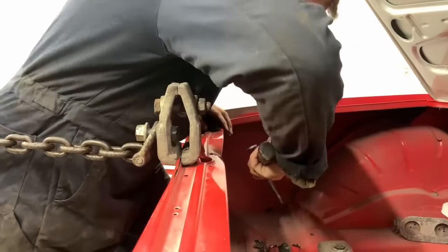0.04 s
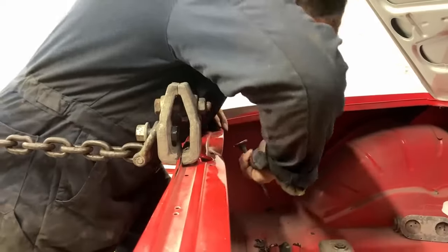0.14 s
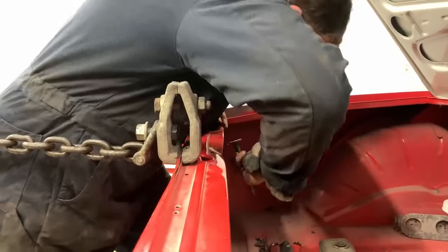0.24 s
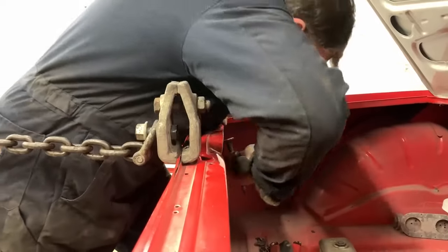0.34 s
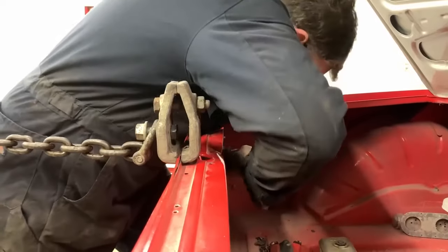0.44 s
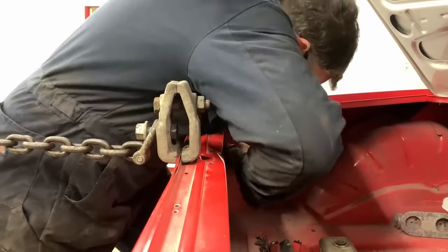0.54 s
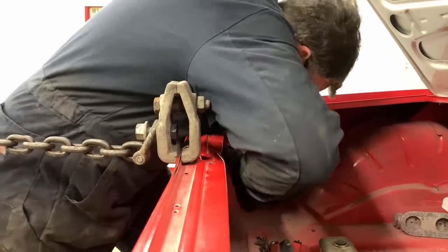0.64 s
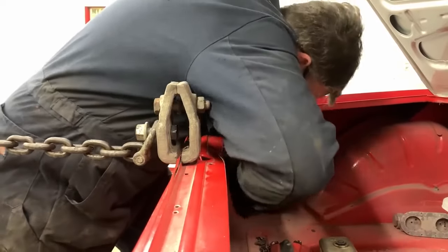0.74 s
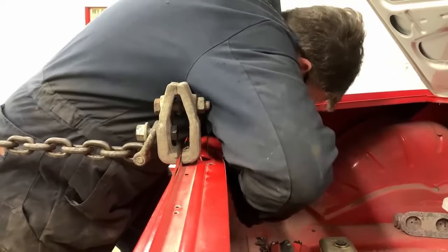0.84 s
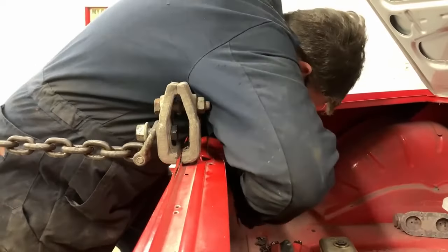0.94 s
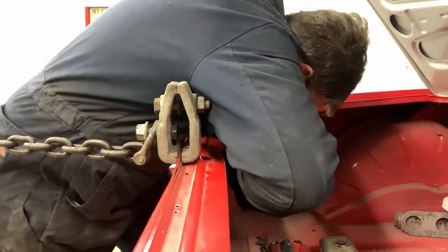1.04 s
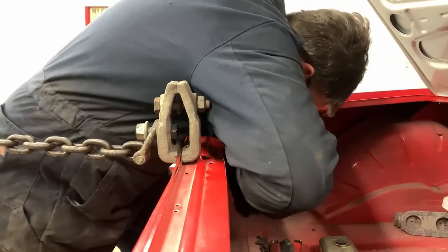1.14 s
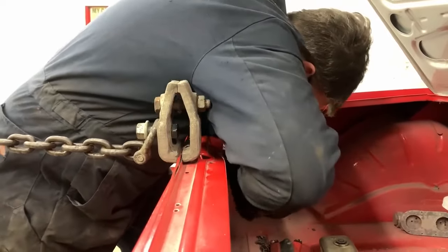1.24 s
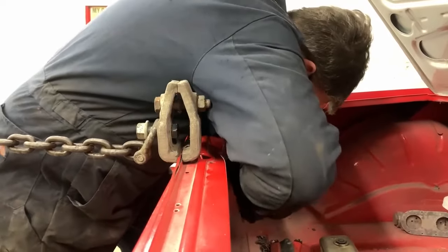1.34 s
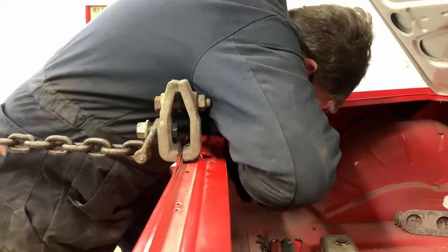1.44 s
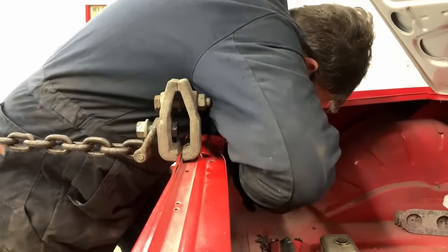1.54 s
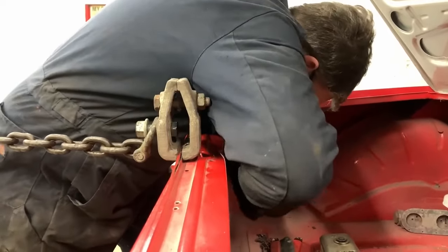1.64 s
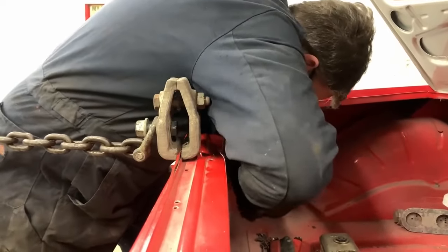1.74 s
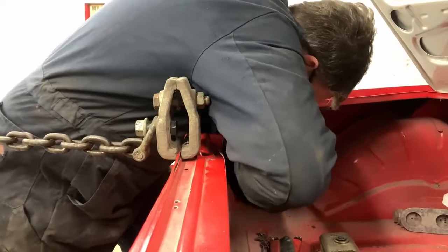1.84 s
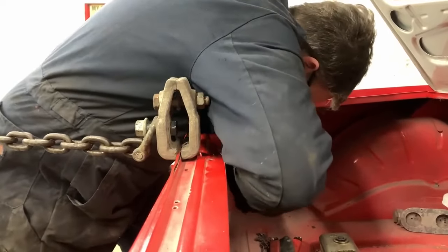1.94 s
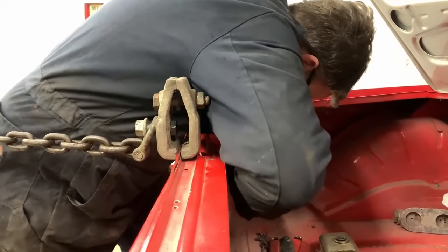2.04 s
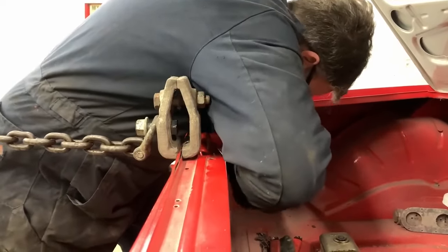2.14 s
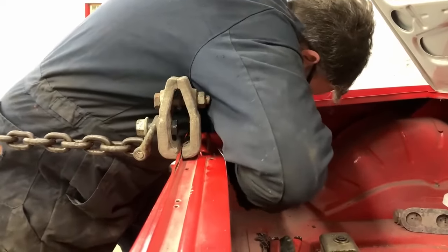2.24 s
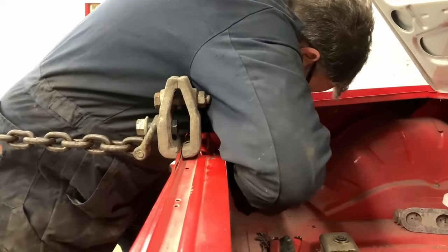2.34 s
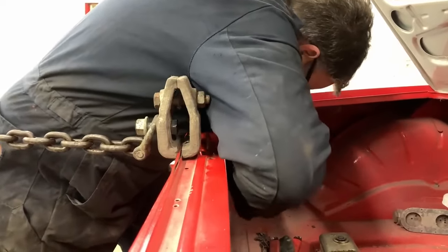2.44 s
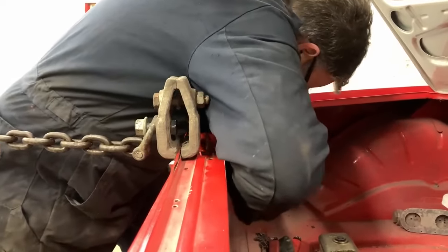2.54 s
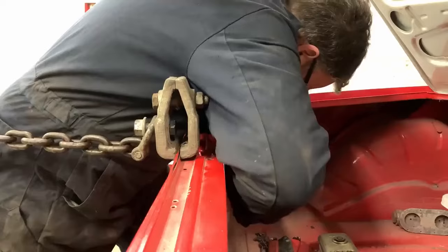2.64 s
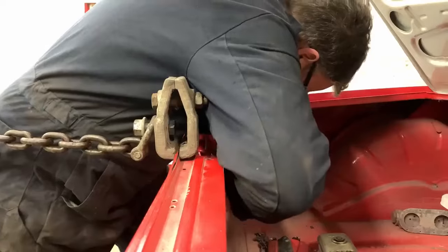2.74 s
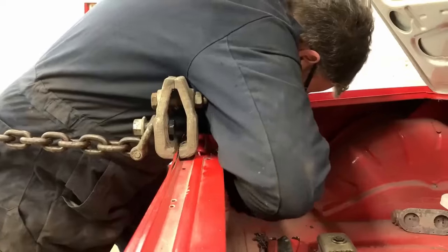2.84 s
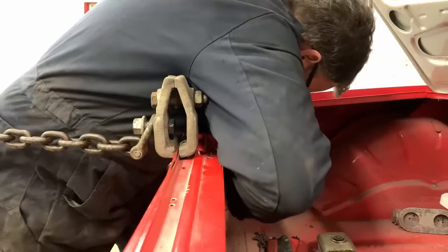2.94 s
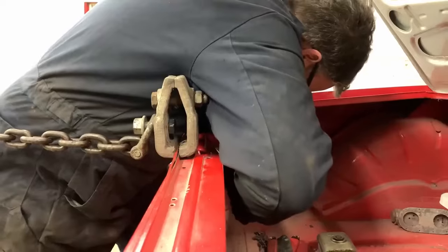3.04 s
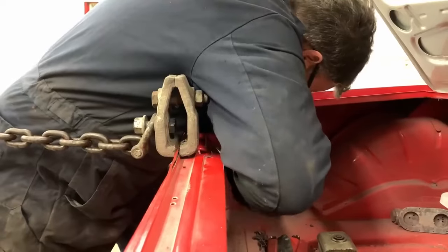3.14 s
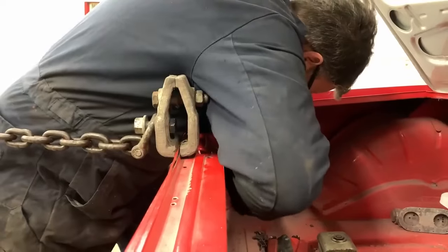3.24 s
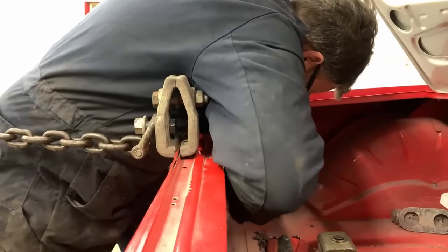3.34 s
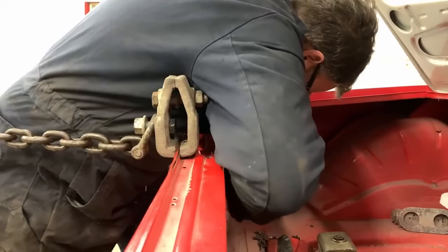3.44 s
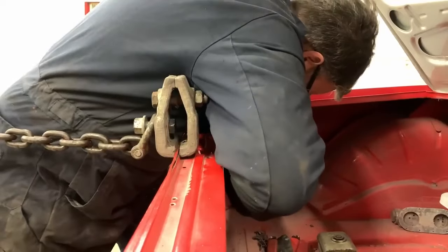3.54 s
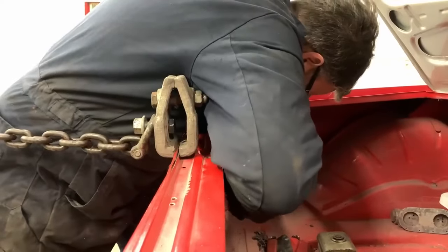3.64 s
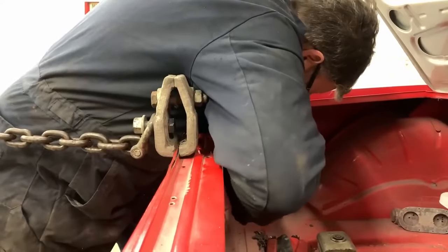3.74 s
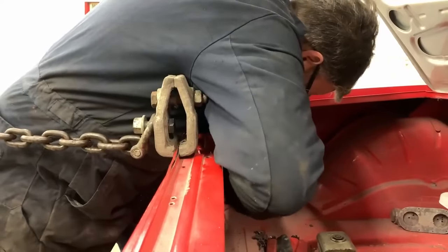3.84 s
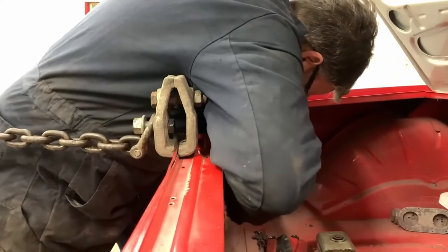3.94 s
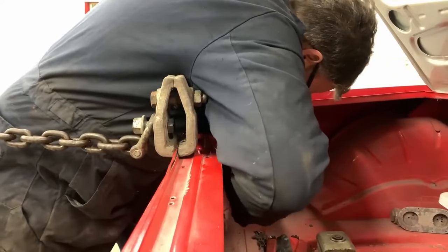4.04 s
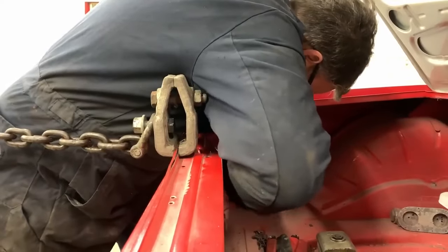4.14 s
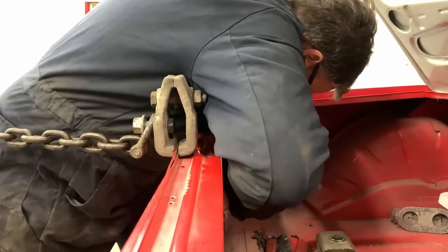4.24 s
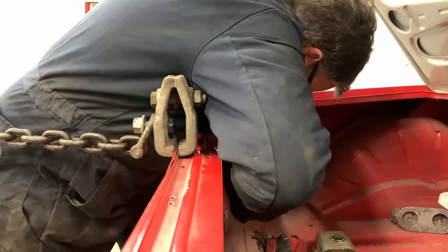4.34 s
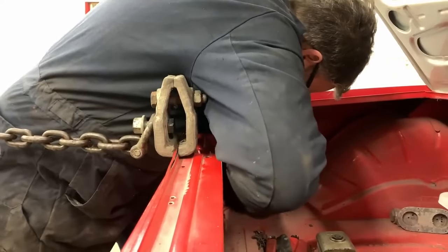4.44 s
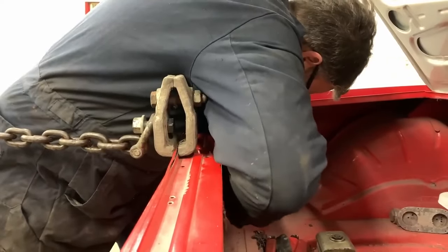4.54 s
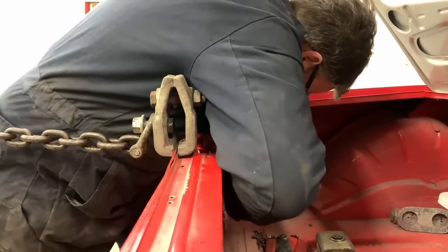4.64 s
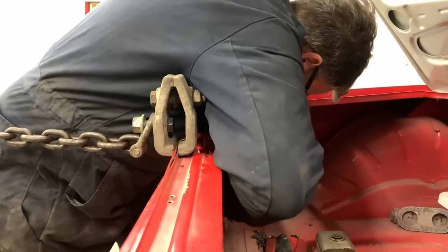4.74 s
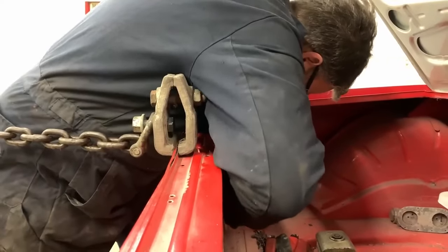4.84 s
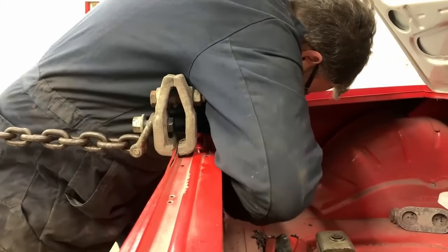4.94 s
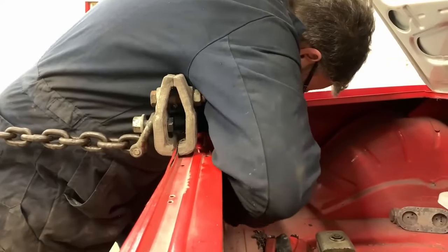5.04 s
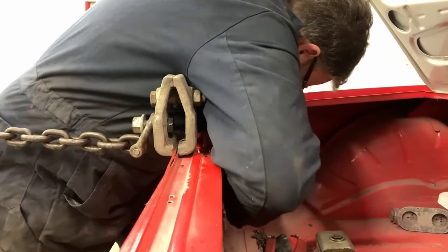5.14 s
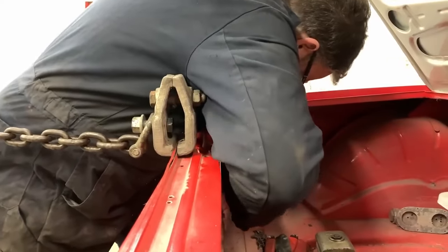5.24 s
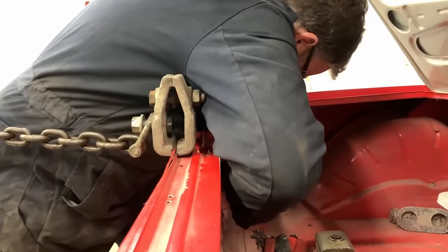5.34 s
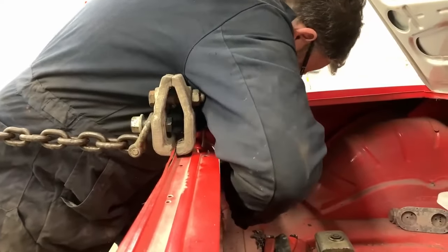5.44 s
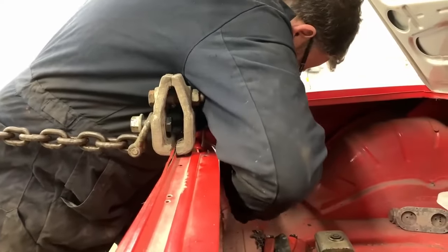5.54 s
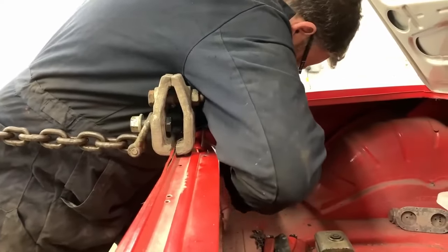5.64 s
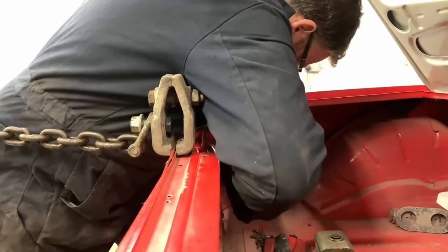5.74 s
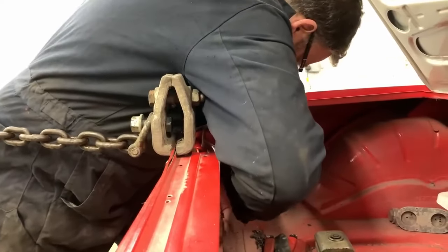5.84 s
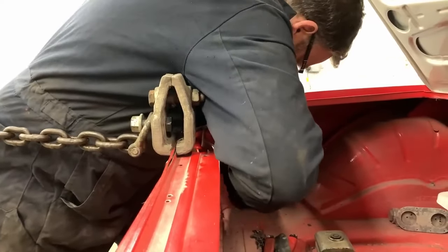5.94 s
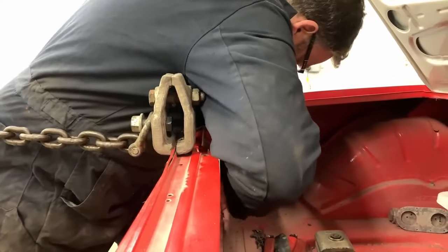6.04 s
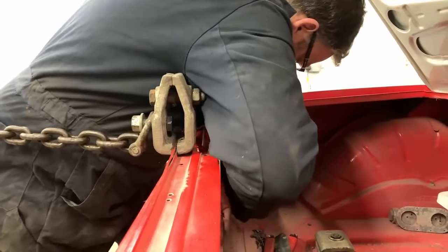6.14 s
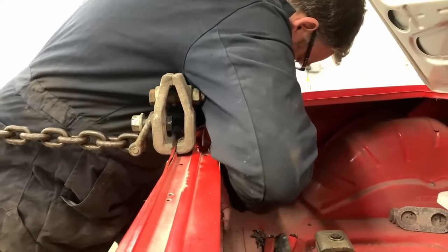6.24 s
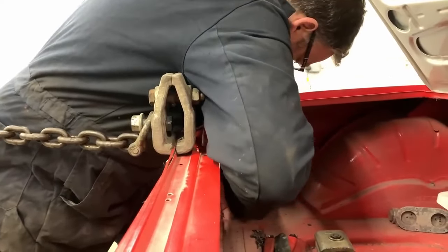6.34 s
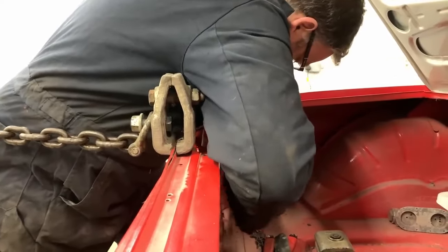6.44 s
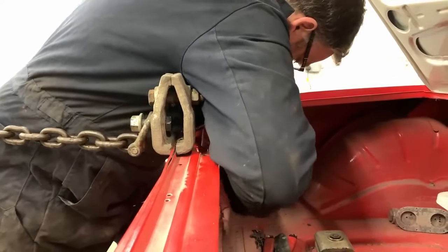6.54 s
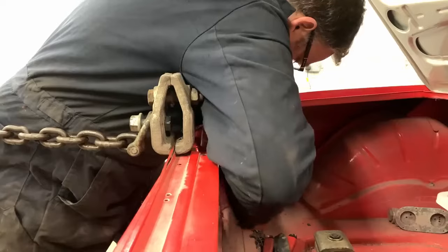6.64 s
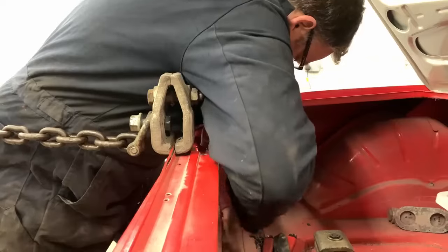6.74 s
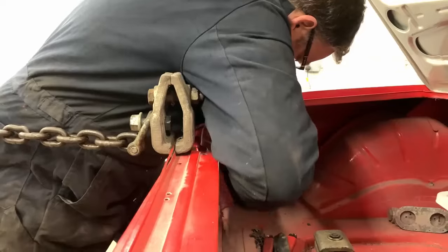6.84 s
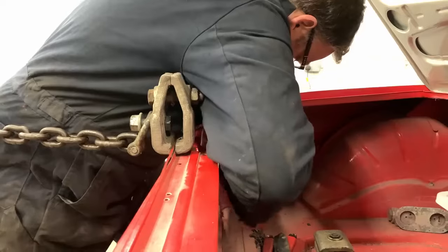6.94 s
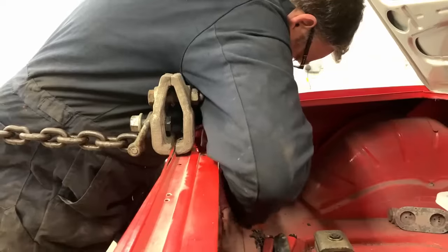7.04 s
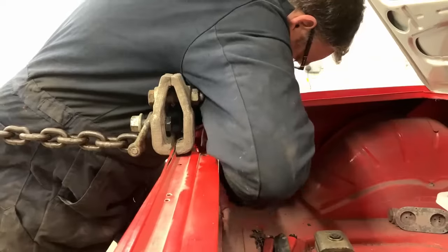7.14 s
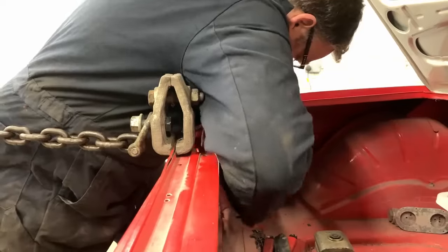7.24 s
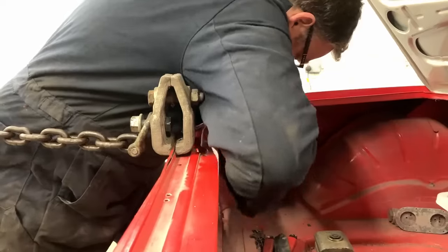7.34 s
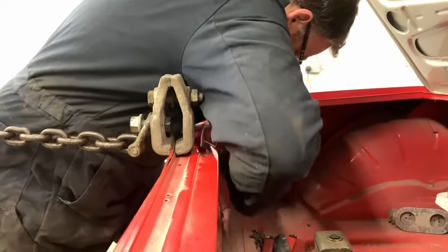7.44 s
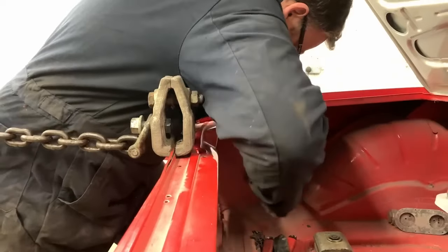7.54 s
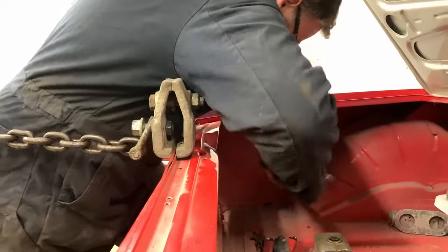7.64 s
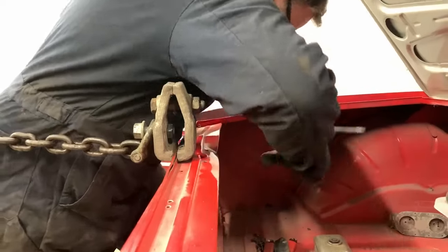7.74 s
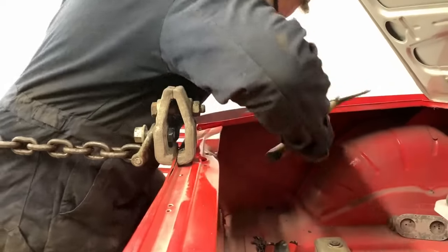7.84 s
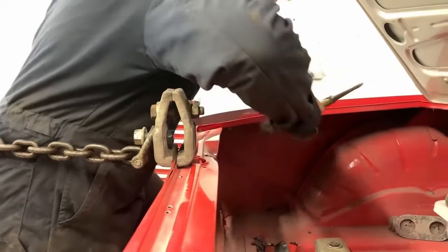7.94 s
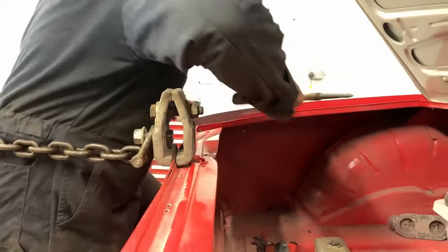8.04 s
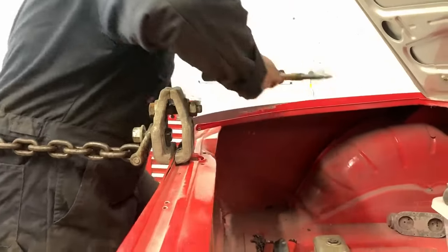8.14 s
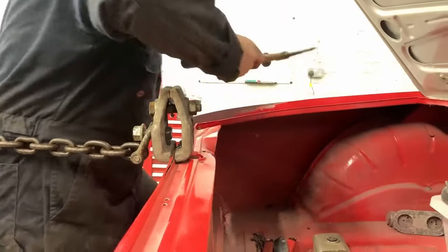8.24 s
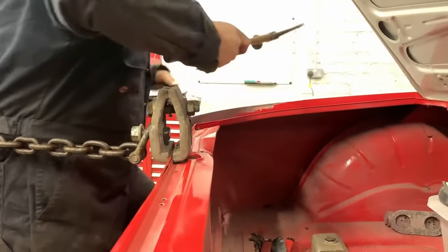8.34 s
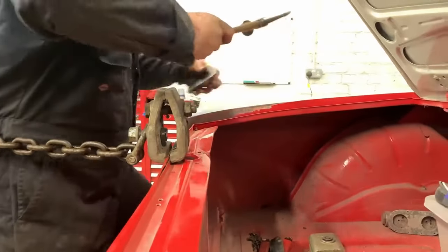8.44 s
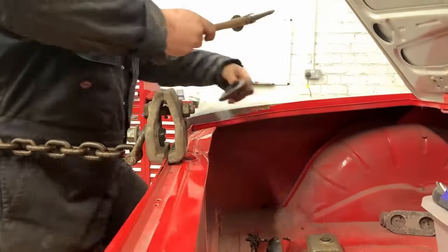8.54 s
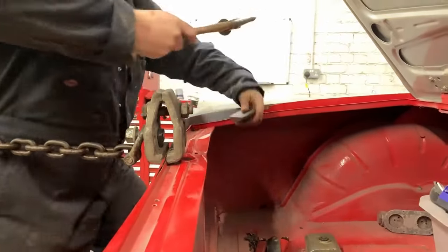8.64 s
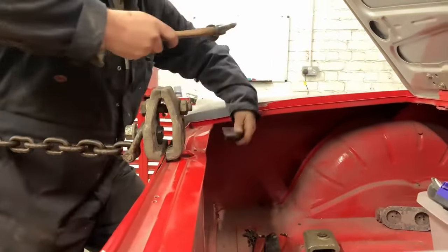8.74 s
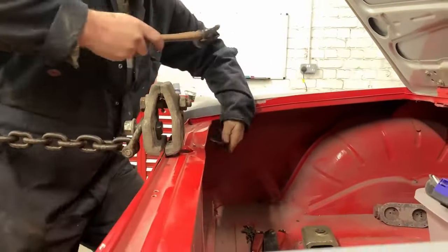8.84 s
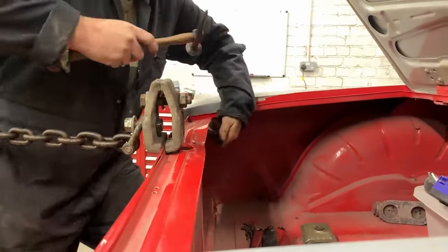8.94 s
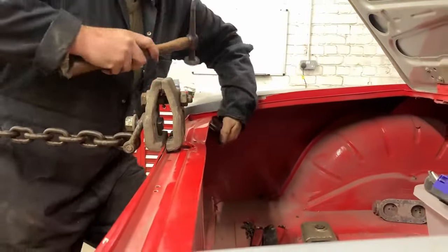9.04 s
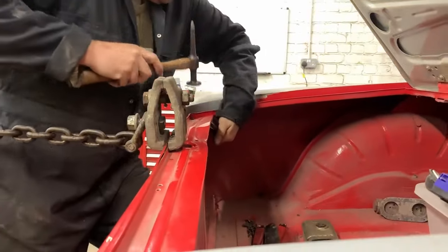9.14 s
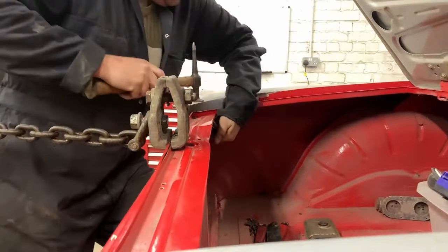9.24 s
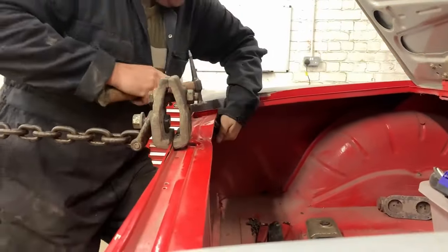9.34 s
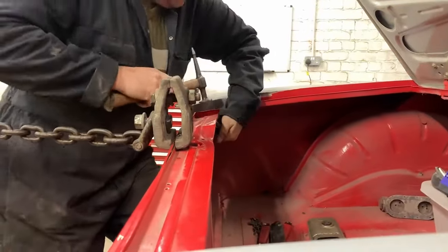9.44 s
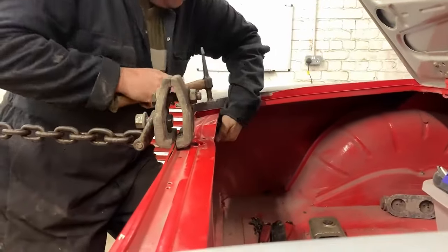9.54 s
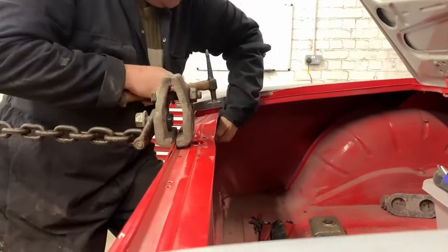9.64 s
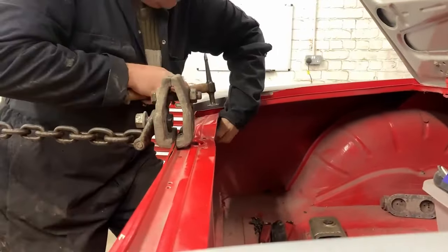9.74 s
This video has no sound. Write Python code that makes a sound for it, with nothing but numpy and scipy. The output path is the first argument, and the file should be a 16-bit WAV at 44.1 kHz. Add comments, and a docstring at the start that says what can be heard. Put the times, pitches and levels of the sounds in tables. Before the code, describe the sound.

Loud, close hammer blows on car sheet metal, about three a second, with metallic rebounds and a short workshop ring.

```python
"""Hammer and dolly on a car wing.

A body hammer beats a steel inner wing against a hand-held dolly, in runs of about three blows a second.
Each blow sets the sheet crashing (band noise) and the body shell booming (decaying sines); the tools
bounce and clatter after it. The workshop rings on, and full blows overload the close microphone.
Near the end the tools tick in the hand and a sleeve scrapes softly."""
import sys
import numpy as np
from scipy import signal
from scipy.io import wavfile

SR = 44100
rng = np.random.default_rng(int(sys.argv[2]) if len(sys.argv) > 2 else 0)


def log_audio(samples):
    """Write samples as a 16-bit WAV file to the path given in sys.argv[1]."""
    # one column per channel
    frames = np.atleast_2d(samples).T
    # limit to full scale, then quantise
    limited = np.clip(frames, -1, 1)
    pcm = np.round(limited * 32767).astype(np.int16)
    wavfile.write(sys.argv[1], SR, pcm)


N = 431298

# hammer blows: (time [s], strength [dB], dolly firmness [0-1])
BLOWS = [(0.65, -13.5, .65), (1.1054, 2, .1), (1.5036, 4.5, .1), (1.878, 1.5, .15), (2.2164, -3, .05),
         (2.8663, -6, .02), (3.2121, -0.5, .15), (3.565, -1, .1), (3.8828, -2, .15), (4.1751, -1, .08),
         (4.4662, -2, .08), (4.747, 0.5, .1), (5.0328, -1.5, .1), (5.7104, -16, .95), (6.035, -3, .97),
         (6.3463, -3, .95), (6.6343, -1, .9), (6.9176, -2, .95), (7.203, -4, .97), (7.452, -7.5, .97)]
# tool knocks and bounces, from faint bumps to two loud slap-backs:
# (time [s], strength [dB], hardness [0 dull bump - 1 clean clink])
KNOCKS = [(0.002, -56, 0.59), (0.153, -54, .1), (0.659, -21, 0.88), (1.3194, -27.5, 0.46),
          (1.6802, -23.5, 0.83), (2.0552, -22.5, 0.73), (2.4254, -25, 0.83), (2.9305, -19, .75),
          (2.9936, -20, 0.41), (3.2489, -4, .7), (3.3052, -19, 0.91), (3.34, -21.5, .9),
          (3.3635, -21.5, 0.52), (5.0814, -2, 0.87), (5.1047, -10.5, 0.95), (5.3498, -36, .7),
          (5.462, -54.5, .85), (5.69, -56, .5), (9.004, -16, .45), (9.17, -31.5, .02), (9.71, -65.5, 0.99)]
# regripping ticks: (time [s], level [dB], centre [Hz])
GRIP_TICKS = [(8.662, -47, 994), (8.691, -51, 5560), (8.714, -44, 5290), (8.755, -51, 5720),
              (8.789, -50, 6130), (9.685, -52, 799)]
# tone of the spot under the hammer: (time [s], treble [dB], low midrange [dB])
SPOT_TONE = [(1.399, -9, -1.5), (2.0, -5, 2.5), (3.9, -1, 4), (4.899, -3.5, 0.5), (7.2, -1, 2)]
# dense bending modes of the sheet: (frequency [Hz], density [dB/Hz], t60 [s])
SHEET_SPECTRUM = [(30, -53, 0.22), (65, -43, 0.53), (127, -32.5, 0.27), (220, -23.5, .42), (380, -36, 0.41),
                  (694.4, -32, 0.24), (1307, -35, 0.15), (3100, -31, 0.11), (4800, -33, 0.096),
                  (7500, -32, 0.096), (11000, -38, 0.062), (16000, -52, 0.1)]
# low modes of the body shell: (frequency [Hz], level [dB], t60 [s])
SHELL_MODES = [(87.4, -10, 0.47), (157.4, -12.5, .6), (183.7, -13, .6), (199.1, -9, 0.59),
               (225.7, -18, .62), (313, -6.5, 0.4), (458, -10, 0.33), (510.7, -10, 0.27), (599, -9.5, 0.35),
               (665, -9, 0.3), (710.4, -13.5, 0.3), (788, -18, 0.21), (854, -11, .33)]
# modes of the sheet held taut by the dolly: (frequency [Hz], level [dB], t60 [s])
TAUT_MODES = [(912, -8, 0.25), (1060, -12, .35), (1109, -10, 0.17), (1233, -11, 0.42), (1336, -10, 0.26),
              (1540, -13, .2), (1780, -14.5, .32), (2250, -16.5, 0.14), (2720, -12, .17), (3170, -16, 0.23),
              (3430, -19.5, 0.36), (3770, -19, 0.29), (3920, -16.5, 0.3), (5500, -23.5, .26)]
# modes of the hand-damped steel tools: (frequency [Hz], level [dB], t60 [s])
TOOL_MODES = [(2670, -8, 0.069), (3030, -4.5, .11), (3290, -3, 0.081), (4490, -2, 0.069), (5643, -8, 0.14),
              (6640, -8, 0.1), (7430, -4.5, .13), (9680, -9.5, .11)]
# workshop reverberation: (frequency [Hz], density [dB/Hz], t60 [s])
REVERB_SPECTRUM = [(30, -54, 0.82), (111, -41, 0.6), (224, -38, 0.47), (500, -27.5, 0.34),
                   (970, -37.5, .39), (1960, -45, 0.39), (3600, -49, 0.42), (5070, -53.5, 0.42),
                   (7500, -52.5, 0.36), (11900, -60, 0.33), (16000, -72.5, .2)]
# room tone and microphone hiss: (frequency [Hz], density [dB/Hz])
FLOOR_SPECTRUM = [(30, -108), (60, -99), (100, -95), (190, -95.5), (350, -102), (1000, -107), (3000, -112),
                  (7000, -111), (11000, -115), (16000, -121)]

# by dolly firmness: (loose, firm)
DRUM_DB, SING_DB, REBOUND_DB = (0, 6.5), (-14, -4), (-3.5, -27)
REBOUND_S, BOUNCE_SHRINK, BOUNCE_LOSS_DB = .024, .6, 5   # first flight; later ones shorter, weaker
# by knock hardness: (dull bump, plain knock, clean clink)
KNOCK_BOOM_DB, KNOCK_TREBLE_DB, KNOCK_RING_DB = (0.5, 1.5, -2), (-55, -11.5, -7), (-50, -15, 6.5)
BOOM_DB_PER_DB = 0.1944   # gentler contacts last longer, so carry more bass

CUTOFF_HZ = 15900
BAND_EDGES_HZ = np.geomspace(25, 18000, 27)
BAND_HZ = np.sqrt(BAND_EDGES_HZ[1:] * BAND_EDGES_HZ[:-1])
MODE_HZ = np.array(SHELL_MODES + TAUT_MODES + TOOL_MODES)[:, 0]
RING_TIME_S = np.arange(int(.7 * SR)) / SR


def hammer(strike, ring_db=-11, rebound_bass_db=-4, bounces=2):
    """A loose dolly is thrown off and slaps back; a firm one barely bounces, and the taut sheet sings."""
    out = np.zeros(N)
    spot_s, *spot_tone_db = np.transpose(SPOT_TONE)
    delays_s = np.cumsum(REBOUND_S * BOUNCE_SHRINK ** np.arange(bounces))
    for time_s, db, firmness in BLOWS:
        drum_db, sing_db, rebound_db = (between(v, firmness) for v in (DRUM_DB, SING_DB, REBOUND_DB))
        treble_db, boom_db = (np.interp(time_s, spot_s, column) for column in spot_tone_db)
        add(out, time_s, from_db(db) * strike(drum_db, boom_db, treble_db, ring_db, sing_db))
        for bounce, delay_s in enumerate(delays_s):
            slap = strike(drum_db + rebound_bass_db, boom_db + rebound_bass_db,
                          treble_db, ring_db, sing_db)
            add(out, time_s + delay_s, from_db(db + rebound_db - BOUNCE_LOSS_DB * bounce) * slap)
    return out


def panel(noise, bloom_s=0.006, room_rise_s=0.018, correlation=.55, scatter_db=2.0, spot_count=8):
    """The steel wing in its room; returns a function that strikes it on a random spot."""
    sheet_rise_s = bloom_s / (1 + BAND_HZ / 400)   # low bending waves are slow: bass builds later
    sheet_envelopes = swell_and_die(*at_bands(SHEET_SPECTRUM), sheet_rise_s)
    room_envelopes = swell_and_die(*at_bands(REVERB_SPECTRUM), room_rise_s)
    common = correlation * dense_ring(noise, sheet_envelopes, .5)
    spots = []
    for _ in range(spot_count):
        local = (1 - correlation ** 2) ** .5 * dense_ring(noise, sheet_envelopes, rng.random())
        reverb = dense_ring(noise, room_envelopes, rng.random())
        modes = np.vstack([mode_ring(SHELL_MODES, bloom_s, detune=.015),
                           mode_ring(TAUT_MODES, 1 / SR, detune=.006),
                           mode_ring(TOOL_MODES, 1 / SR, detune=.003)])
        spots.append((common + local, reverb, modes))

    def strike(drum_db, boom_db, treble_db, ring_db, sing_db):
        """One contact: sheet crash, modes of shell, taut sheet and tool, room reverberation."""
        crash, reverb, modes = spots[rng.integers(spot_count)]
        band_gain = np.float32(tone_gain(BAND_HZ, drum_db, boom_db, treble_db))
        mode_db = np.repeat([0, sing_db, ring_db], [len(SHELL_MODES), len(TAUT_MODES), len(TOOL_MODES)])
        mode_db = mode_db + rng.normal(0, scatter_db, len(MODE_HZ))
        mode_gain = np.float32(tone_gain(MODE_HZ, drum_db, boom_db, treble_db) * from_db(mode_db))
        return close_echoes(band_gain @ crash) + mode_gain @ modes + band_gain @ reverb
    return strike


def dense_ring(noise, envelopes, position):
    """Unresolved modes as noise dying band by band; position (0-1) picks the fine pattern."""
    first = int(position * (N - len(RING_TIME_S)))
    return envelopes * noise[:, first:first + len(RING_TIME_S)]


def mode_ring(modes, rise_s, detune):
    """One decaying sine per mode, slightly detuned by hand pressure."""
    hz, db, t60_s = np.transpose(modes)
    shift, phase_cycles = rng.standard_normal((2, len(hz), 1))
    detuned_hz = hz[:, None] * (1 + detune * shift)
    angle_rad = 2 * np.pi * (detuned_hz * RING_TIME_S + phase_cycles)
    return swell_and_die(db, t60_s, rise_s) * np.sin(np.float32(angle_rad))


def swell_and_die(db, t60_s, rise_s):
    """One envelope per row: quick build-up, exponential decay."""
    t = np.float32(RING_TIME_S)
    columns = (from_db(db), np.log(1000) / t60_s, rise_s)
    gain, decay_per_s, attack_s = (np.float32(np.reshape(v, (-1, 1))) for v in columns)
    return gain * (1 - np.exp(-t / attack_s)) * np.exp(-t * decay_per_s)


def tone_gain(hz, drum_db, boom_db, treble_db):
    """Place and force of a contact tip the low and high modes around the midrange."""
    anchors_hz = [100, 160, 280, 500, 1600, 6000]
    anchors_db = [drum_db, boom_db, boom_db, 0, 0, treble_db]
    return from_db(np.interp(np.log(hz), np.log(anchors_hz), anchors_db))


def close_echoes(crash, gain_db=-7, above_hz=450):
    """Nearby metal faces reflect the short waves within milliseconds, rippling the spectrum."""
    highpass = signal.butter(2, above_hz, "high", fs=SR, output="sos")
    reflection = from_db(gain_db) * signal.sosfilt(highpass, crash)
    out = crash.copy()
    for lag in rng.integers(SR // 1000, SR // 180, size=3):
        out[lag:] += reflection[:-lag]
    return out


def clatter(strike, drum_offset_db=-7, sing_db=-10):
    """Tools bounce and settle on the steel: hard contacts clink, soft ones thud."""
    out = np.zeros(N)
    for time_s, db, hardness in KNOCKS:
        boom_db = between(KNOCK_BOOM_DB, hardness) - BOOM_DB_PER_DB * db
        treble_db = between(KNOCK_TREBLE_DB, hardness)
        ring_db = between(KNOCK_RING_DB, hardness)
        knock = strike(boom_db + drum_offset_db, boom_db, treble_db, ring_db, sing_db)
        add(out, time_s, from_db(db) * knock)
    return out


def grip_ticks(t60_s=0.082, trim_db=-1):
    """Short, broadband ticks as the tools are regripped."""
    out = np.zeros(N)
    decay = np.exp(-np.log(1000) * RING_TIME_S / t60_s)
    for time_s, db, hz in GRIP_TICKS:
        bandpass = signal.butter(1, [hz / 2, min(hz * 2, CUTOFF_HZ)], "band", fs=SR, output="sos")
        tick = signal.sosfilt(bandpass, rng.standard_normal(len(decay)) * decay)
        add(out, time_s, from_db(db + trim_db) * tick / np.abs(tick).max())
    return out


def sleeve_scuff(start_s=9.70, level_db=-60, band_hz=(620, 1400), slips_per_s=900, rise_s=0.057):
    """A soft sleeve scrape near the end: dense little slips."""
    slips = (rng.random(N) < slips_per_s / SR) * rng.standard_normal(N)
    bandpass = signal.butter(2, band_hz, "band", fs=SR, output="sos")
    scrape = signal.sosfilt(bandpass, slips + 1e-18)
    pressure = np.clip((np.arange(N) / SR - start_s) / rise_s, 0, 1)
    return from_db(level_db) * pressure * scrape / scrape.std()


def room_tone(noise):
    """Steady, quiet workshop air and microphone hiss."""
    return from_db(at_bands(FLOOR_SPECTRUM)[0]) @ noise


def band_noise():
    """One noise row per band at 0 dB/Hz; neighbours uncorrelated."""
    white = rng.standard_normal((2, N)) * np.sqrt(SR / 2)
    rows = []
    for k in range(len(BAND_HZ)):
        bandpass = signal.butter(2, BAND_EDGES_HZ[k:k + 2], "band", fs=SR, output="sos")
        rows.append(signal.sosfilt(bandpass, white[k % 2]))
    return np.array(rows, dtype=np.float32)


def at_bands(spectrum):
    """Spectrum columns interpolated at the band centres."""
    hz, *columns = np.transpose(spectrum)
    return [np.interp(np.log(BAND_HZ), np.log(hz), column) for column in columns]


def between(steps, share):
    """Value a share (0-1) of the way through evenly spaced steps."""
    return np.interp(share, np.linspace(0, 1, len(steps)), steps)


def from_db(db):
    """Decibels to gain."""
    return 10 ** (np.asarray(db) / 20)


def add(track, time_s, sound):
    """Mix a sound into the track from time_s."""
    start = max(0, round(time_s * SR))
    track[start:start + len(sound)] += sound[:N - start]


def scene():
    """Hammering, clatter and handling over room tone; mono."""
    noise = band_noise()
    strike = panel(noise)
    return (hammer(strike) + clatter(strike) + grip_ticks() + sleeve_scuff() + room_tone(noise))[None]


def record(dry, clip_level=0.54, coupling_hz=9):
    """The input clips flat; lowest bass and top treble are cut."""
    clipped = np.clip(dry, -clip_level, clip_level)
    highpass = signal.butter(1, coupling_hz, "high", fs=SR, output="sos")
    lowpass = signal.ellip(10, .1, 80, CUTOFF_HZ, fs=SR, output="sos")
    return signal.sosfilt(lowpass, signal.sosfilt(highpass, clipped))


dry = scene()
out = record(dry)
log_audio(out)
```